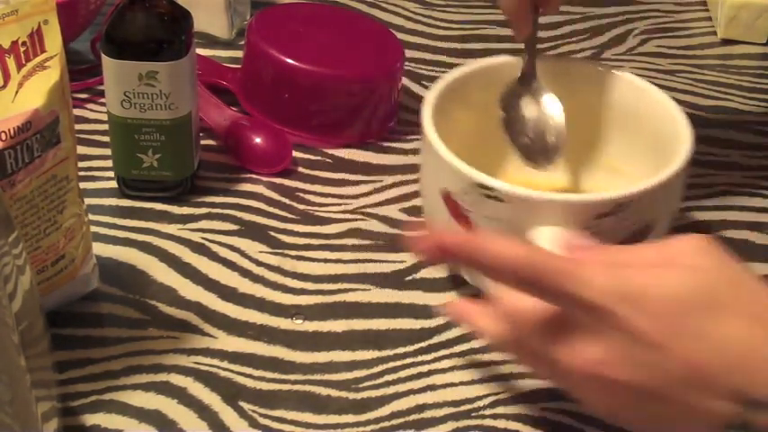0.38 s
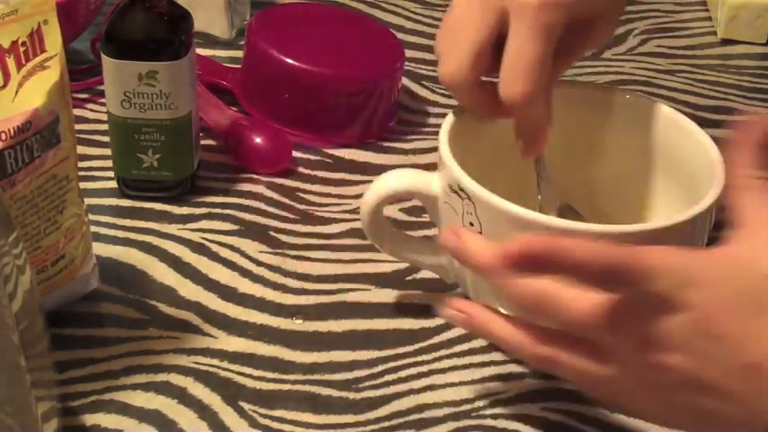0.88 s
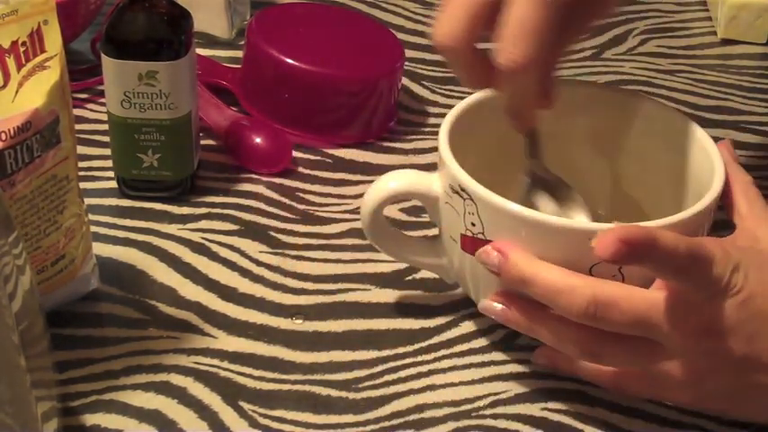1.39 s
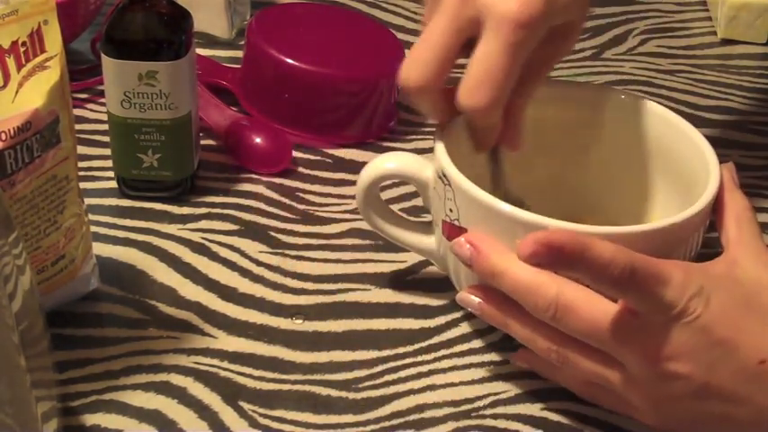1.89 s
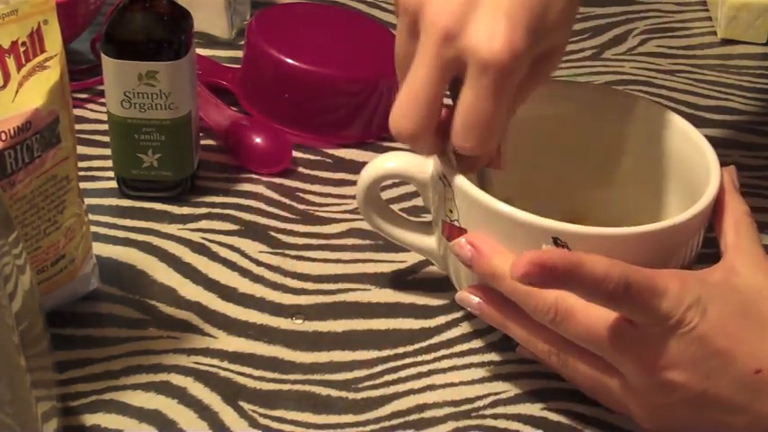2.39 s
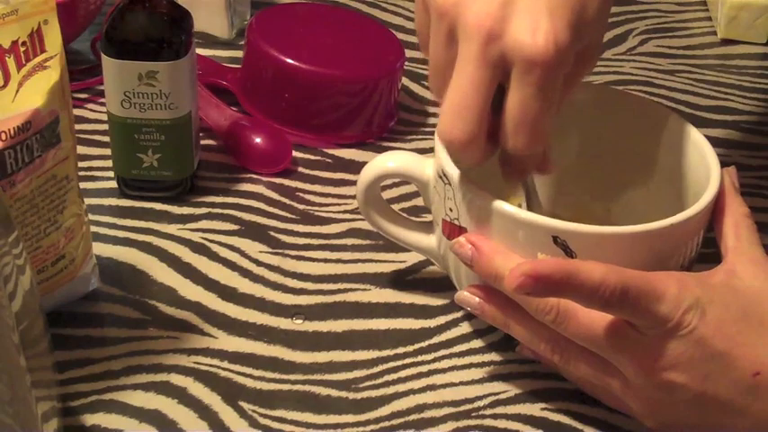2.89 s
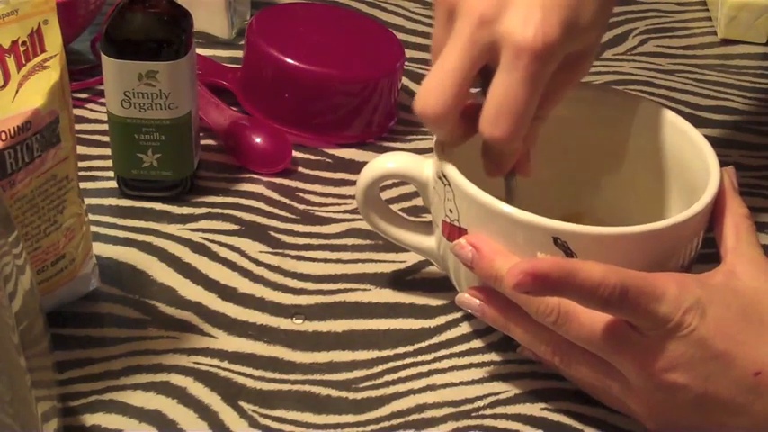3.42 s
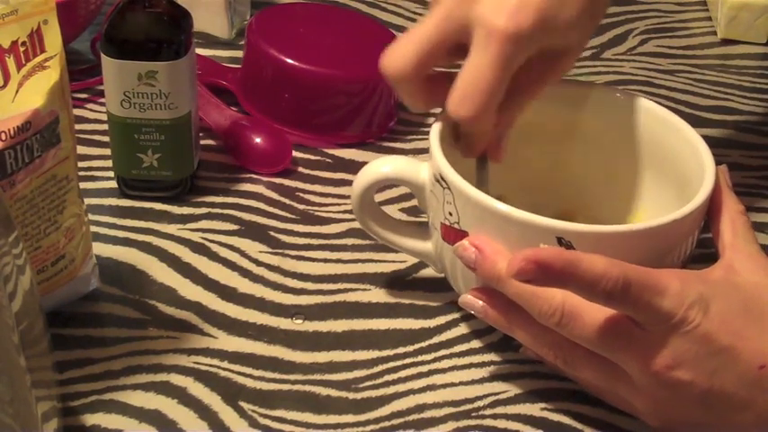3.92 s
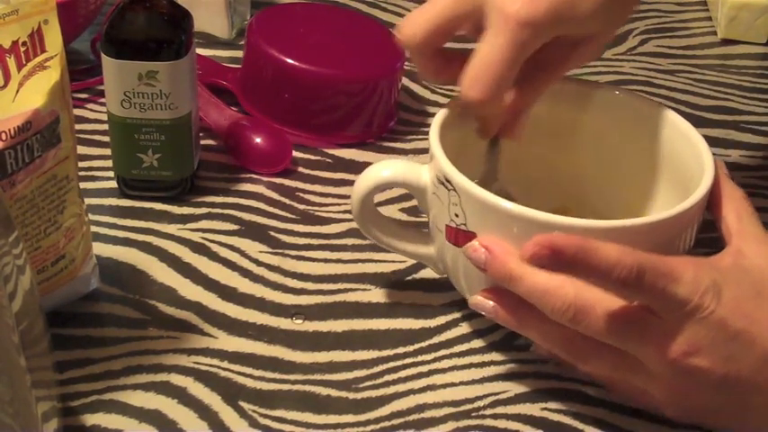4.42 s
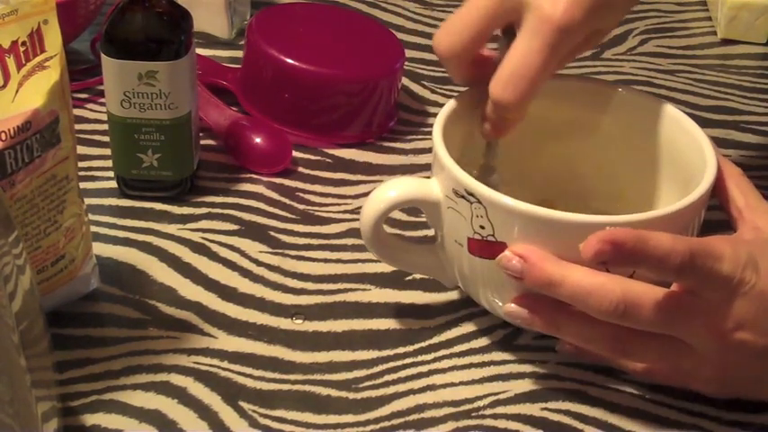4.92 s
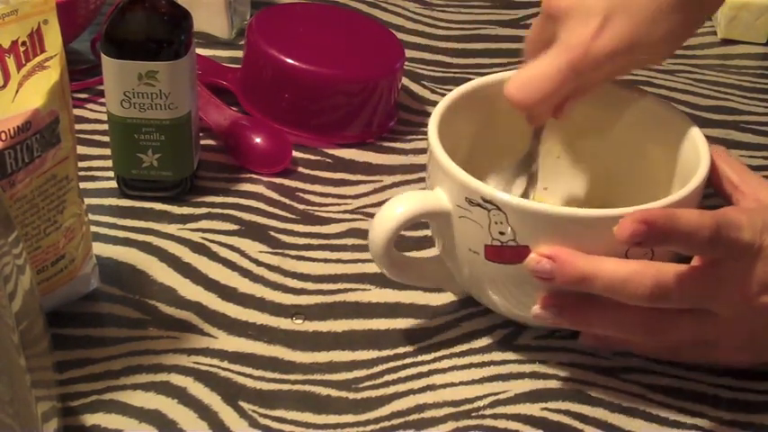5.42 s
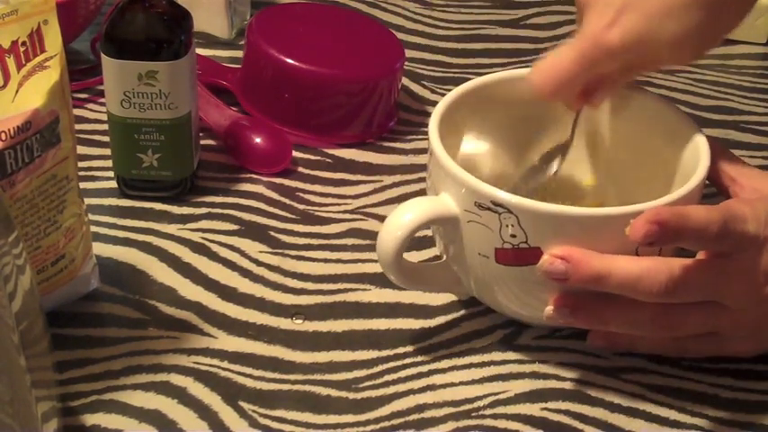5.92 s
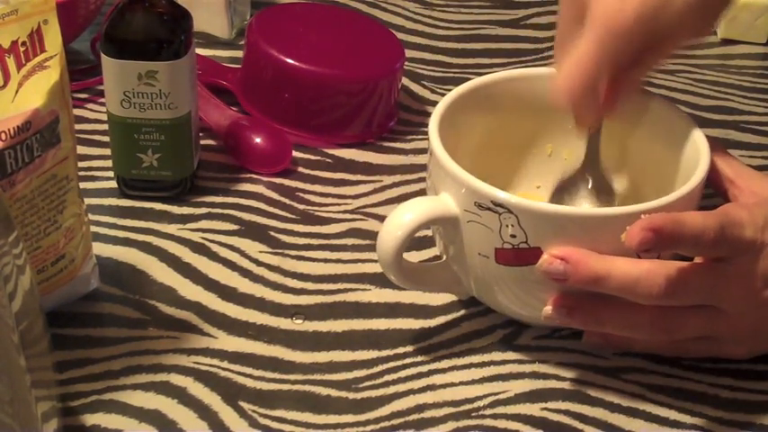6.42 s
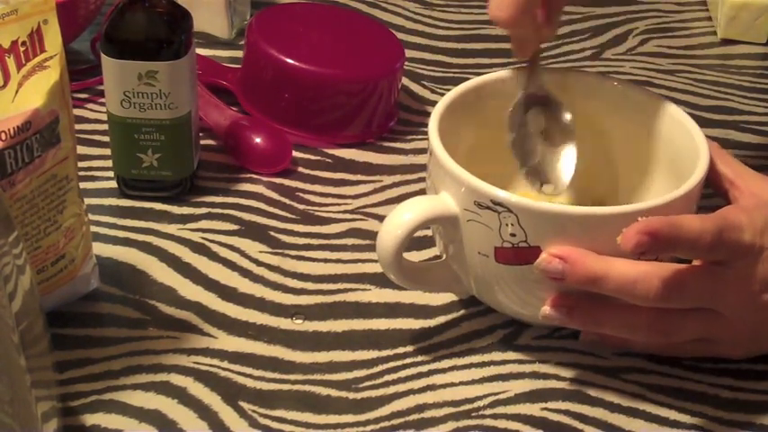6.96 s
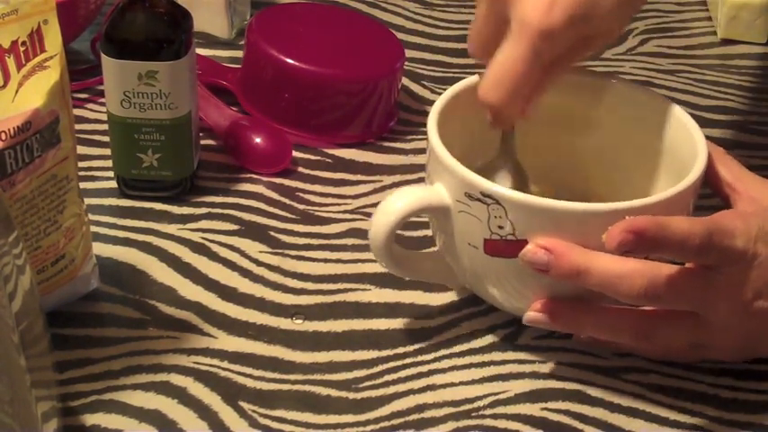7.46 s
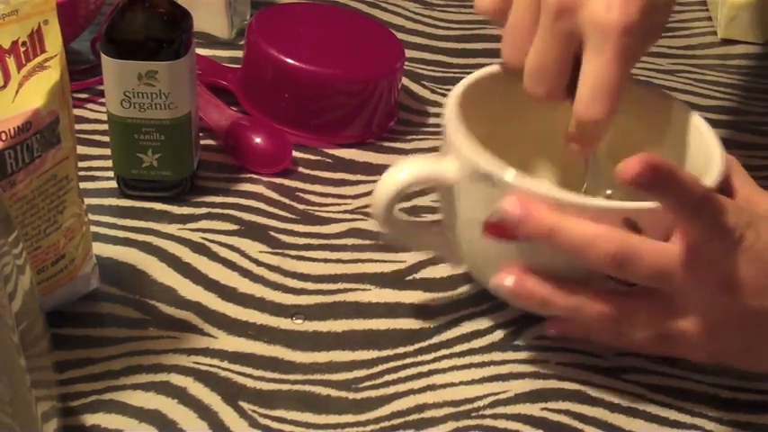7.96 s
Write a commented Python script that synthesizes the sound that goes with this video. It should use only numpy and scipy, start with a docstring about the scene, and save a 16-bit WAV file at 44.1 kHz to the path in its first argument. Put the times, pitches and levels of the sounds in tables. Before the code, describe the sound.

Sparse bright spoon clinks against a ceramic mug, faint gritty scraping and dull knocks on a covered table, in a quiet kitchen with fan noise.

```python
"""Spoon in a mug of dough

A steel spoon clinks and scrapes inside a wide ceramic mug of dough on a cloth-covered table: decaying sines
ring the mug and spoon, noise bursts make the contacts, the thuds on the table and the snaps of sticky dough.
Swells of grainy noise are the scrapes, with a faint thin tone in one slide. A fan hums as coloured noise in
the quiet kitchen, and the small microphone's baseline swings at three hard blows."""
import sys
import numpy as np
from scipy import signal
from scipy.fft import rfft, irfft, next_fast_len
from scipy.io import wavfile
from scipy.ndimage import uniform_filter1d, map_coordinates

SR = 44100
rng = np.random.default_rng(int(sys.argv[2]) if len(sys.argv) > 2 else 0)


def nominal_scale(level):
    """Amplitude ratio for a level in decibels (scalar or array-like)."""
    x = np.asarray(level, float) / 20
    return 10 ** x


def log_audio(samples):
    """Write samples as a 16-bit WAV file to the path given in sys.argv[1]."""
    # one column per channel
    frames = np.atleast_2d(samples).T
    # limit to full scale, then quantise
    limited = np.clip(frames, -1, 1)
    pcm = np.round(limited * 32767).astype(np.int16)
    wavfile.write(sys.argv[1], SR, pcm)


N = 356239  # length [samples]


def unit(x):
    """Scaled to rms 1."""
    return x / np.sqrt(np.mean(x ** 2) + 1e-20)


def along(points, hz):
    """Reads a curve of (frequency [Hz], value) points, with straight lines on a log frequency axis."""
    f, v = np.transpose(points)
    return np.interp(np.log(hz + 1), np.log(f + 1), v)


def filtered(x, response):
    """x with its spectrum multiplied by a response, given as a function of frequency."""
    m = next_fast_len(len(x) + 8192)
    return irfft(rfft(x, m) * response(np.fft.rfftfreq(m, 1 / SR)), m)[:len(x)]


def peaks(table):
    """Response of resonances (centre [Hz], width [Hz], level [dB]), added with alternating sign."""
    def response(f):
        total = 0
        for k, (centre, width, db) in enumerate(table):
            resonance = 1j * f * width / (centre * centre - f * f + 1j * f * width)
            total = total + (-1) ** k * nominal_scale(db) * resonance
        return total
    return response


def wobble(rate):
    """A smooth random curve, rate knots a second."""
    return map_coordinates(rng.standard_normal(int(N * rate / SR) + 4), [np.arange(N) * rate / SR])


def add(out, s, sound):
    """Mixes a sound in at s seconds."""
    part = out[round(s * SR):][:len(sound)]
    part += sound[:len(part)]


def burst(response, t60, size):
    """Coloured noise that starts at once, from rms 1, and dies away by 60 dB in t60 seconds."""
    return unit(filtered(rng.standard_normal(size), response)) * nominal_scale(-60 * np.arange(size) / SR / t60)


def ring(t, s, crack_db, ring_db, bright_db, place):
    """Mug wall and spoon ring as decaying sines; a wall mode sounds as far as it moves at the struck place."""
    # wall modes: (pitch [Hz], basic t60 [s], level [dB], turn of the pattern [degrees])
    # the handle splits a mode into a pair turned by 90 degrees
    mug = [(4205, .105, 0, 10), (1580, .095, -4.3, 0), (1705, .2, 2, 90), (3985, .095, 2.8, 100),
           (6067, .22, -13.3, 137), (8075, .08, -14.5, 0), (7130, .08, -18, 0)]
    # waves around the wall, one number for each wall mode
    waves = [3, 2, 2, 3, 4, 0, 0]
    # the hand-held spoon: (pitch [Hz], basic t60 [s], level against the crack setting [dB])
    spoon = [(2039, 0.057, -23), (3117, 0.053, -21), (3390, 0.11, -37), (5460, 0.023, -16.5),
             (10400, 0.1, -36), (11400, .06, -57), (12900, .05, -32)]
    # mug tilted clear of the dough: all rings higher, its treble longer and, in the gripping hand, bass shorter
    # (until [s], pitch ratio, frequency of unchanged decay [Hz], power of frequency in the decay)
    lifted = (.7, 1.009, 2900, .75)
    until, pitch_ratio, same_decay_hz, decay_power = lifted

    hz, t60, mode_db = np.transpose([mode[:3] for mode in mug + spoon])[:, :, None]
    turn = np.transpose(mug)[-1]
    motion = np.abs(np.cos(np.radians(np.multiply(waves, place) - turn)))
    wall = nominal_scale(ring_db + bright_db * np.log2(np.transpose(mug)[0] / 4500)) * motion
    strength = np.append(wall, np.full(len(spoon), nominal_scale(crack_db)))[:, None]
    strength = strength * nominal_scale(mode_db + rng.normal(0, 1, hz.shape))

    # after a soft tap the spoon rests on the wall and damps it
    free = np.clip(1 + (crack_db + 20) / 110, .78, 1.05)
    pitch = hz
    if s < until:
        pitch = hz * pitch_ratio
        free = free * np.minimum((hz / same_decay_hz) ** decay_power, 1.3)

    # spoon and hand still touch, so each mode is uneven in level and phase
    knots = rng.standard_normal((len(hz), 30))
    touch = np.array([np.interp(t, np.linspace(0, t[-1], 30), k) for k in knots])
    level = strength * nominal_scale(2.5 * touch - 60 * t / t60 / free)
    modes = level * np.sin(2 * np.pi * (pitch * t + .04 * touch))
    # a light touch builds its ring more slowly
    rise_s = .0002 * nominal_scale(-.75 * (crack_db + 12))
    return modes.sum(axis=0) * (1 - np.exp(-t / rise_s))


def crack(t, crack_db, bright_db):
    """Steel meets glaze: a short noise burst whose strength ripples as the contact chatters."""
    # colour of the contact: (frequency [Hz], density [dB per Hz])
    colour = [(35, -31), (60, -10), (514, -4.5), (1360, -7), (4510, -1.5), (6090, -13), (8030, -10),
              (9010, -18.5), (12200, -13.5), (14000, -30), (15000, -42)]
    # only heavy blows move the whole mug and sound its bass
    weight_hz = min(60 * nominal_scale(-1.3 * (crack_db + 12)), 1200)

    def response(f):
        tilt_db = bright_db * np.log2(np.maximum(f, 1800) / 4500)
        return nominal_scale(along(colour, f) + tilt_db) * f / (f + weight_hz)

    noise = burst(response, t60=0.029, size=len(t))
    chatter = nominal_scale(3.0 * np.cos(2 * np.pi * t / 0.00273))
    return nominal_scale(crack_db - 7.0) * noise * chatter * (1 - np.exp(-t / 0.00017))


def taps():
    """Spoon on mug: each blow joins the ring of wall and spoon with the crack of the contact."""
    # (time [s], crack setting [dB], ring setting [dB], brightness [dB per octave],
    #  place around the wall from the handle [degrees])
    blows = [(0.4987, -21.5, -28.0, 4.5, 146.0), (0.5476, -42.0, -36.5, 2.5, 101.0),
             (0.597, -44.0, -41.0, 1.5, 83.0), (1.3104, -24.5, -36.5, -4.0, 9.0),
             (1.6803, -44.0, -45.0, 0.0, 72.0), (1.7732, -45.0, -56.5, 1.5, 102.0),
             (2.0249, -28.5, -38.0, -7.0, 179.0), (2.072, -46.0, -44.0, -1.0, 4.0),
             (2.1211, -47.5, -42.5, 1.0, 1.0), (2.161, -42.5, -56.5, 0.0, 4.0),
             (2.2194, -49.0, -55.5, 2.0, 176.0), (2.5631, -55.0, -46.5, -2.0, 179.0),
             (2.579, -49.0, -46.0, 0.5, 177.0), (2.604, -47.0, -50.0, -4.0, 176.0),
             (2.9241, -11.0, -19.5, 1.5, 177.0), (3.034, -52.0, -45.5, 1.0, 175.0),
             (3.2638, -37.0, -45.0, -1.5, 7.0), (3.3368, -54.0, -50.5, -0.5, 4.0),
             (3.5342, -43.5, -50.0, 1.0, 96.0), (3.5644, -53.0, -52.5, 2.0, 95.0),
             (3.5893, -55.0, -45.0, 0.5, 97.0), (4.2149, -37.5, -37.5, 6.5, 12.0),
             (5.471, -37.5, -55.5, -9.5, 43.0), (7.3322, -12.5, -27.0, 2.0, 63.0),
             (7.6879, -19.0, -33.0, -1.0, 6.0), (7.9031, -39.0, -55.5, -10.0, 39.0),
             (7.928, -54.0, -57.5, 1.0, 95.0)]
    out, t = np.zeros(N), np.arange(SR // 4) / SR
    for s, crack_db, ring_db, bright_db, place in blows:
        add(out, s, ring(t, s, crack_db, ring_db, bright_db, place) + crack(t, crack_db, bright_db))
    return out


def smears(count=36):
    """Faint brushes at chance moments while the dough is pressed, each a little different in level and pitch."""
    # (from [s], to [s], length [s], middle level [dB], spread either way [dB], middle pitch [Hz], width [Hz])
    brushes = (1, 6.8, .035, -71, 2.5, 7500, 4000)
    start, end, length, db, spread_db, hz, width = brushes
    strokes = []
    for when, strong, high in rng.random((count, 3)):
        middle = start + (end - start) * when
        # the pitch falls between 0.5 and 1.5 times the middle pitch
        strokes.append((middle, length, db + spread_db * (2 * strong - 1), hz * (.5 + high), width))
    return strokes


def scrape():
    """Spoon slides on glaze and dough, mug shifts on the cloth: swells of dense uneven grains, each with a pitch."""
    # (middle [s], length [s], level before the grit [dB], centre [Hz], resonance width [Hz])
    strokes = [(0.453, 0.3, -56, 6260, 9000), (0.571, 0.23, -58.5, 8440, 8000),
               (0.759, 0.04, -64, 8100, 2500), (0.955, 0.043, -60.5, 3100, 500),
               (1.655, 0.043, -53, 4250, 120), (1.747, 0.46, -68, 6800, 7040),
               (1.759, 0.044, -59.5, 250, 302), (1.859, 0.057, -61, 2680, 300),
               (2.213, 0.43, -71, 9550, 7000), (2.469, 0.044, -63.5, 9700, 6000),
               (3.472, .053, -65.5, 8400, 4000), (3.593, .054, -64, 10000, 5000),
               (3.773, 0.04, -66, 9000, 9000), (3.984, .06, -69, 9300, 7000),
               (4.028, 0.052, -62.5, 5950, 2500), (4.253, 0.11, -65, 420, 303),
               (4.49, .08, -58.5, 3440, 1500), (4.78, .07, -69, 10000, 6000),
               (4.914, .04, -66.5, 8300, 4000), (5.304, 0.11, -66, 3440, 900),
               (5.609, 0.043, -68, 4400, 900), (6.158, 0.035, -60.5, 5860, 1800),
               (6.409, 0.031, -63, 7300, 1500), (7.003, 0.12, -54, 6000, 11200),
               (7.447, 0.079, -68, 6080, 30), (7.644, 0.07, -59.5, 3440, 900),
               (7.874, .066, -56, 1100, 120)]
    out, grit = np.zeros(N), nominal_scale(1.9 * wobble(400) + 1.7 * wobble(50))
    t = np.arange(16000) / SR
    for s, length, db, hz, width in strokes + smears():
        # squared: the noise passes the resonance twice
        noise = filtered(rng.standard_normal(16000), lambda f: peaks([(hz, width, 0)])(f) ** 2)
        swell = np.sin(np.pi * np.clip(t / length, 0, 1)) ** 1.15
        add(out, s - length / 2, nominal_scale(db) * unit(noise) * swell)
    return out * grit


def thuds():
    """The table takes knocks: a sharp contact, then the table top rumbles under its cloth. Mostly the mug's
    foot meets the table; at 7.689 s the table top answers a spoon tap."""
    # (time [s], level setting [dB]); the row at 7.689 s is the table answering the spoon tap
    knocks = [(0.369, -20.5), (7.689, -34), (7.7633, -28), (7.7692, -21)]
    # resonances of the table top: (centre [Hz], width [Hz], level [dB])
    table_top = [(180, 66, -2.5), (345, 107, -0.5), (485, 78, 0.5), (710, 87, -3), (1420, 720, -9.5),
                 (2050, 260, -10), (2500, 140, -14), (4240, 49, -16)]
    out = np.zeros(N)
    for s, db in knocks:
        contact = burst(lambda f: peaks([(2500, 7000, 0)])(f) ** 2, t60=0.022, size=2000)
        rumble = burst(peaks(table_top), t60=0.094, size=9000)
        add(out, s, nominal_scale(db - 12.0) * contact)
        add(out, s, nominal_scale(db - 10.0) * rumble)
    return out


def ticks():
    """Sticky dough lets go in short dry snaps of noise, each around its own pitch."""
    # (time [s], level setting [dB], centre [Hz])
    snaps = [(0.0711, -45, 6150), (1.8545, -54, 6130), (2.2542, -47, 6050), (2.304, -50, 7360),
             (3.243, -38, 11000), (3.8261, -42.5, 12100), (4.4562, -48, 6950), (4.8633, -45, 7520)]
    out = np.zeros(N)
    for s, db, hz in snaps:
        snap = burst(lambda f: peaks([(hz, .8 * hz, 0)])(f) ** 2, t60=0.035, size=3000)
        add(out, s, nominal_scale(db - 11.5) * snap)
    return out


def whistle():
    """A thin, rough tone comes and goes during one slide, its level and pitch wandering."""
    # (start [s], length [s], level before roughness [dB])
    tones = [(1.61, .08, -66.5), (1.8, .09, -71), (1.91, .21, -71), (2.18, .07, -75)]
    t = np.arange(N) / SR
    on = sum(nominal_scale(db) * np.sin(np.pi * np.clip((t - s) / length, 0, 1)) ** .5 for s, length, db in tones)
    hz = 4980 + 14 * wobble(60)
    tone = np.sin(2 * np.pi * np.cumsum(hz) / SR)
    return np.sqrt(2) * on * nominal_scale(3.5 * wobble(45)) * tone


def fan():
    """Air noise, slightly patchy in time and pitch, is lifted by narrow resonances of the fan housing."""
    # colour of the air noise: (frequency [Hz], density [dB per Hz])
    air_colour = [(18, -40), (30, -4.5), (49, -18.5), (160, -14), (356, -12), (678, -1.5), (999, -4.5),
                  (1110, -3), (1720, -7.5), (1950, -7.5), (2400, -15.5), (4020, -13.5), (4810, -18),
                  (10200, -27), (14200, -34)]
    # fan housing: (centre [Hz], width [Hz], lift over the air noise [dB])
    housing = [(420, 19.5, 7), (682.3, 21, 7.5), (887, 44, 5), (1100, 36.4, 9.5), (1370, 7.7, 11.5),
               (1500, 56, 7), (1922, 23, 6), (2935, 430, 4), (3960, 69, 4.5)]
    z = signal.stft(rng.standard_normal(N), nperseg=512)[2]
    patches = uniform_filter1d(uniform_filter1d(rng.standard_normal(z.shape), 6, 0), 10, 1)
    air = signal.istft(z * nominal_scale(0.96 * unit(patches)), nperseg=512)[1][:N]

    def response(f):
        lift_db = sum(db / (1 + (2 * (f - c) / w) ** 2) for c, w, db in housing)
        return nominal_scale(along(air_colour, f) + lift_db)

    level_db = -54 + 0.85 * wobble(2.53)  # drifts slowly
    return nominal_scale(level_db) * unit(filtered(air, response))


def kitchen(x):
    """The room answers with a tail of noise in which each frequency dies at its own speed."""
    # (frequency [Hz], t60 [s])
    decay = [(200, 0.42), (2000, 0.18), (10000, 0.21)]
    hz, t, z = signal.stft(rng.standard_normal(SR // 2), SR, nperseg=256)
    tail = signal.istft(z * nominal_scale(-60 * t / along(decay, hz)[:, None]), SR, nperseg=256)[1]
    delayed = np.pad(x, (150, 0))  # the answer starts 150 samples late
    return signal.fftconvolve(delayed, tail / np.linalg.norm(tail))[:N]


def scene():
    """The mug near the microphone, in the kitchen."""
    near = taps() + thuds() + ticks() + scrape()
    return (near + nominal_scale(-12.5) * kitchen(near) + whistle() + fan())[None]


def baseline(settle_s=0.094):
    """The rest level kicks down, holds, ramps back; the coupling capacitor makes it overshoot and settle."""
    # (start [s], held depth before the capacitor [dB], held until [s after start], back at [s after start])
    swings = [(0.4978, -41.5, 0.048, 0.073), (2.926, -37.5, 0.068, .1), (7.331, -30, 0.019, .12)]
    kick, offset = 0.8, -.0004  # extra share of the depth at first; constant shift of the rest level
    t, drop = np.arange(N) / SR, np.zeros(N)
    for s, db, held, back in swings:
        drop -= nominal_scale(db) * np.interp(t - s, [0, .0015, .0029, held, back], [0, 1 + kick, 1, 1, 0])

    def capacitor(f):
        turn = 2j * np.pi * f * settle_s
        return turn / (1 + turn)

    return filtered(drop, capacitor) + offset


def roll_off(x):
    """The treble ends steeply here."""
    return signal.sosfilt(signal.butter(12, 15130, fs=SR, output="sos"), x)


def record(dry):
    """The baseline swings join the sound, and nothing from 14250 Hz up passes the band limit."""
    mix = filtered(dry[0] + baseline(), lambda f: f < 14250)
    return roll_off(mix[None])


dry = scene()
out = record(dry)
log_audio(out)
```